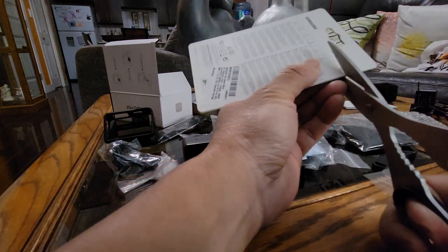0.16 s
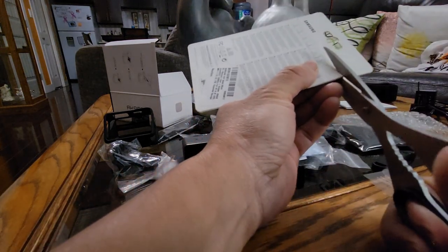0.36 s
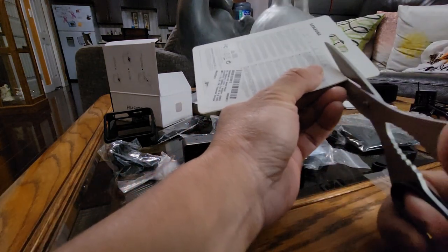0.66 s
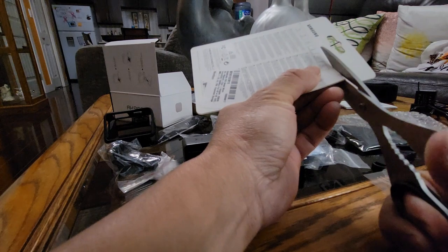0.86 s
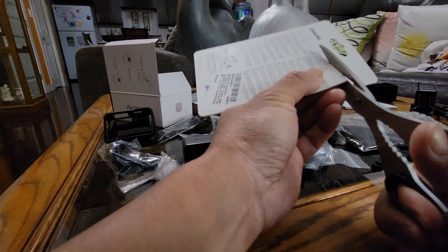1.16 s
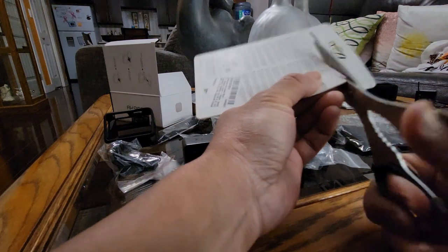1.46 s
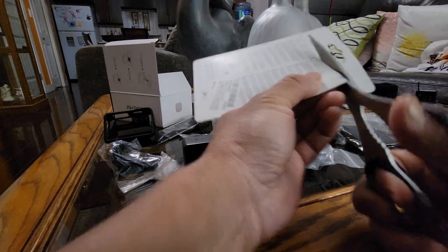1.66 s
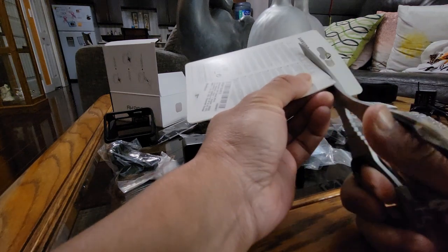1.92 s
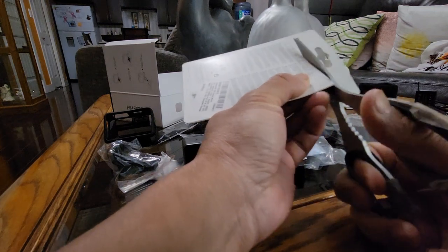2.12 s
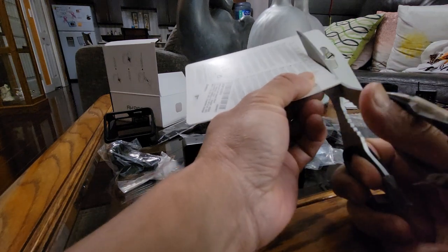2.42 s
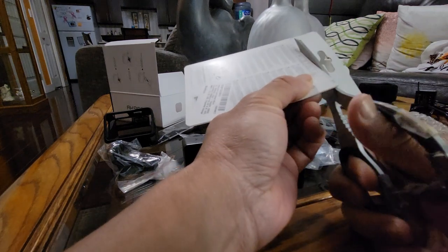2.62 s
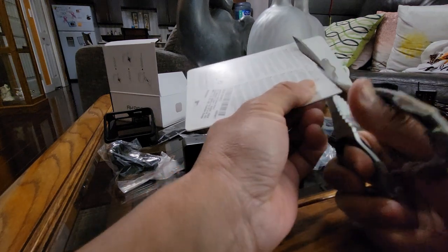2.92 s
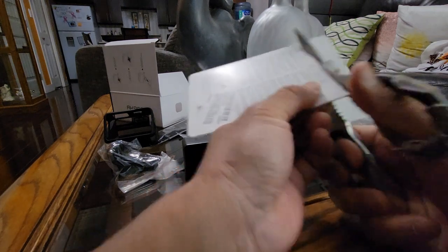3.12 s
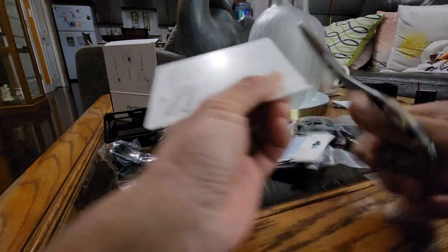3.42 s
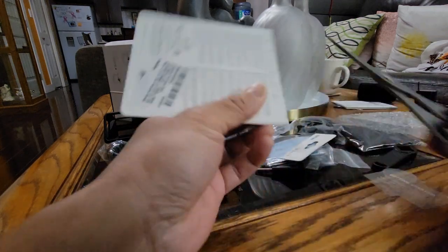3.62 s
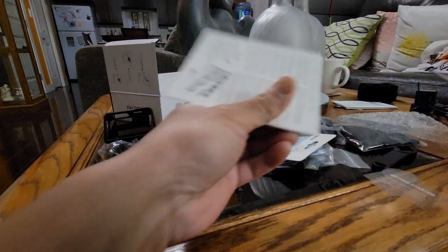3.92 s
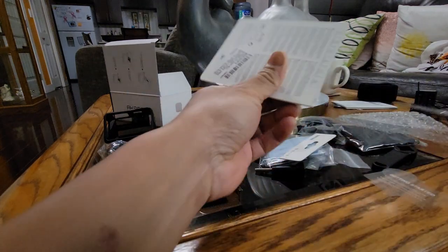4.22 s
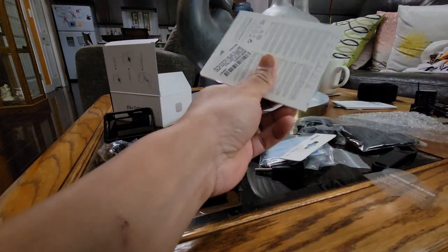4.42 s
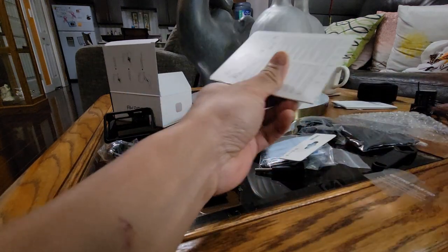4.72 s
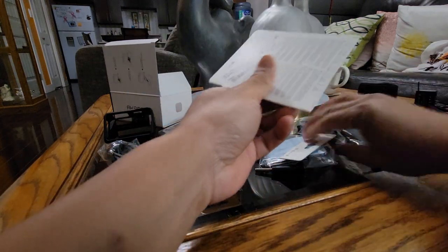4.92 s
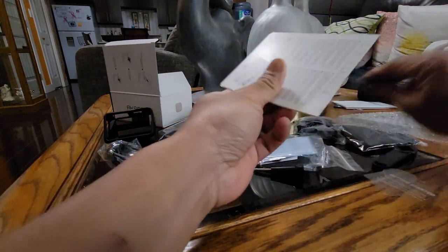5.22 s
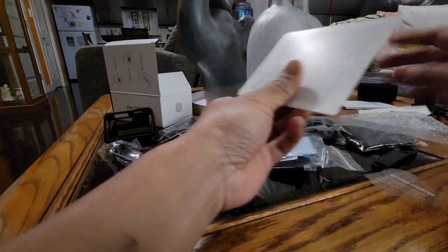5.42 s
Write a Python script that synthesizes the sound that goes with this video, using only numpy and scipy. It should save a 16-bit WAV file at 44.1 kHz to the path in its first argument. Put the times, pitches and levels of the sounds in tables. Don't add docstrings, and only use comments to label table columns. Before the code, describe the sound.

Close, gritty snipping and creaking of scissors in packaging, one sharp snap, a knocking put-down on wood, then brief plastic rustling in a quiet room.

```python
import sys
import numpy as np
from scipy import signal
from scipy.fft import rfft, irfft
from scipy.io import wavfile
from scipy.ndimage import uniform_filter1d, map_coordinates

SR = 44100
rng = np.random.default_rng(int(sys.argv[2]) if len(sys.argv) > 2 else 0)


def voltage_ratio(decibels):
    exponent = np.asarray(decibels, float) / 20
    return 10 ** exponent


def wav_out(sig):
    wavfile.write(sys.argv[1], SR, np.round(np.clip(np.atleast_2d(sig).T, -1, 1) * 32767).astype(np.int16))


N = 245637
TIME = np.arange(N) / SR

# hz, width_hz, level_db
SHELL_MODES = [(920, 400, -7.5), (1250, 160, -2), (1680, 187, -2.5), (2200, 220, -10)]
# hz, width_hz, level_db
BLADE_MODES = [(2810, 354, -4.5), (3430, 220, -0.5), (3810, 293, -2.5), (4940, 590, -9.5),
               (5320, 800, -10.5), (6837, 1100, -11)]
# start_s, left_lag_ms, left_minus_right_db
HAND_PLACE = [(0, .42, -4), (.6, .42, -2), (.75, .2, -3.5), (1.1, .2, -4), (1.45, .07, -2.7),
              (2.6, .03, -.5), (3.2, .04, -3), (4.2, .1, -2), (4.45, .24, -2), (4.9, .14, -4),
              (5.1, .14, -3), (5.35, .28, -4)]


def rms_one(x):
    return x / np.sqrt(np.mean(x ** 2) + 1e-20)


def at_hz(points, hz):
    table_hz, value = np.transpose(points)
    return np.interp(np.log(hz + 1), np.log(table_hz), value)


def body(x, modes):
    out = 0
    for k, (hz, width_hz, db) in enumerate(modes):
        r = np.exp(-np.pi * width_hz / SR)
        zeros = [(1 - r * r) / 2, 0, (r * r - 1) / 2]
        poles = [1, -2 * r * np.cos(2 * np.pi * hz / SR), r * r]
        out = out + (-1) ** k * voltage_ratio(db) * signal.lfilter(zeros, poles, x + 1e-18)
    return out


def cut(x, hz, kind, order=2):
    return signal.sosfilt(signal.butter(order, hz, kind, fs=SR, output="sos"), x)


def grit(spread_db, alike):
    sizes = voltage_ratio(spread_db * np.minimum(rng.exponential(1, N), 6))
    mid, side = rng.standard_normal((2, N)) * sizes
    alike = np.clip(alike, 0, 1)
    return rms_one(np.sqrt(1 + alike) * mid + np.sqrt(1 - alike) * side * [[1], [-1]])


def driven(force, source, modes):
    return body(force * source, modes) / np.std(body(source[0, :30000], modes))


def pan(db):
    return voltage_ratio(np.array([[db / 2], [-db / 2]]))


def pulse(t, rise_ms, fall_ms):
    return np.where(t < 0, np.exp(-(t / rise_ms) ** 2 / 2), np.exp(-np.abs(t) / fall_ms))


def swells(rows, rest_db):
    out = voltage_ratio(np.array(rest_db)[:, None]) * np.ones(N)
    for at, first_db, second_db, rise_ms, fall_ms in rows:
        drop_db = -20000 * np.where(TIME < at, (at - TIME) / rise_ms, (TIME - at) / fall_ms)
        out = np.maximum(out, voltage_ratio(np.array([[first_db], [second_db]]) + drop_db))
    return out


def floor():
    # hz, level_db per Hz
    hush = [(15, -24), (25, -7), (97, 3.5), (197, -11.5), (378, -2), (524, -13.5), (669, -5), (979, -13),
            (1280, -12), (1930, -18.5), (5420, -24.5), (6550, -27.5), (8140, -72.5), (14800, -41.5),
            (16500, -50.5)]
    hush_db = -67.5
    hz = np.fft.rfftfreq(N, 1 / SR)
    mid, side = irfft(rfft(rng.standard_normal((2, N))) * voltage_ratio(at_hz(hush, hz)), N)
    side = cut(side, 260, "high", order=1)
    return voltage_ratio(hush_db) * (mid + 1.27 * side * [[1], [-1]]) / np.std(mid)


def rumble():
    # peak_s, rumble_db, flap_db, rise_ms, fall_ms
    heaves = [(.33, -51.5, -68, 120, 180), (.76, -50, -60, 87, 68), (.94, -53, -77, 63, 70),
              (1.13, -44, -75, 44, 65), (2.31, -70, -60.5, 140, 15), (1.54, -55, -86, 21, 54),
              (2.95, -59, -62.5, 210, 44), (3.11, -75, -57, 37, 130), (3.24, -53.5, -58.5, 47, 290),
              (4.03, -52, -80, 23, 90), (4.33, -44, -64, 14, 78), (4.5, -57.5, -61.5, 110, 300),
              (4.59, -37.5, -45, 132, 350), (4.65, -33.5, -58, 130, 78), (4.87, -72, -64, 550, 330),
              (5.42, -43.5, -87, 77, 46), (5.52, -82, -69, 60, 460)]
    # hz, width_hz, level_db
    flap_modes = [(321, 82, 4.5), (430, 119, -1.5), (816, 450, -26)]
    heave, flap = swells(heaves, rest_db=(-70, -79))
    source = grit(0.95, alike=0.87)
    low = cut(cut(source, 190, "low", order=4), 68, "high", order=4)
    flexing = voltage_ratio(-4.0) * heave * rms_one(low) * pan(-1.5)
    return flexing + driven(voltage_ratio(5.5) * flap, source, flap_modes)


def contacts():
    # start_s, card_body_db, air_db
    strokes = [
        (0, -10, -8),
        (.3, -4, -18.5),
        (.6, -1.5, -17.5),
        (1.0, -7, -17.5),
        (1.4, -6, -17.5),
        (1.79, 3, -15.5),
        (2.05, 6, -17),
        (2.5, 1, -12),
        (2.8, 3.5, -15),
        (3.1, 1, -15),
    ]
    # start_s, peak_db, length_ms
    blade_bites = [(0.075, -50.5, 3.2), (0.236, -40, 3), (0.2696, -33, 1.25), (0.2803, -35, 3.9),
                   (0.333, -45, 15), (0.361, -37, 6.6), (0.3743, -36.5, 2.4), (0.7014, -40, 10),
                   (0.7237, -34, 4.4), (0.7336, -36, 12.6), (0.754, -36.5, 4.8), (0.778, -35, 3.5),
                   (1.073, -27, 2.5), (1.084, -35, 12.6), (1.1046, -26, 6.6), (1.144, -26.5, 6),
                   (1.426, -39, 24), (1.449, -31.5, 8.9), (1.464, -30, 9.4), (1.483, -32.5, 11),
                   (1.498, -44, 8.9), (1.1633, -39, 1.7), (1.782, -36.5, 3.6), (1.786, -39, 18),
                   (1.804, -33.5, 12.4), (1.827, -30.5, 7.5), (1.8605, -28.5, 8.8), (2.1426, -51, 4.3),
                  (2.168, -59, 39), (2.22, -46.5, 3.6), (2.536, -38, 14.7), (2.5559, -33, 12.5),
                  (2.573, -33, 11.7), (2.6, -31.5, 2.2), (2.868, -47, 26), (2.8842, -36.5, 14.4),
                  (2.9, -32.5, 14.8), (2.9241, -27.5, 7.5), (2.962, -28.5, 6.4), (3.17, -45, 29),
                  (3.186, -35.5, 10), (3.206, -32, 13.3), (3.229, -35, 6.8)]
    # start_s, peak_db, length_ms, card_body_db
    crackles = [(3.262, -17.5, 6, -11), (3.345, -32.5, 13.5, -9), (3.369, -32, 16.4, -2.5),
                (3.5066, -46, 9, -1), (4.05, -46.5, 7.5, 5), (4.086, -54, 14, 7.5), (4.1343, -41, 4.6, -1),
                (4.352, -39.5, 4.3, -24), (4.402, -39, 1.8, -0.5), (4.7943, -37, 2.2, -28),
                (4.8959, -29.5, 2.2, -5), (4.903, -34.5, 10.3, -5.5), (4.917, -31, 6, -6),
                (4.939, -36, 3.4, -12), (4.952, -28.5, 7.7, -3.5), (4.967, -34.5, 2.4, 10),
                (4.98, -34, 11, -6), (5.019, -37, 19, -30), (5.077, -49, 2.7, 6), (5.3745, -35, 11.7, 1),
                (5.394, -32.5, 6.4, 11), (5.438, -38.5, 5.6, -2), (5.506, -31, 6, 0)]
    crackle_air_db = -16.5
    starts = [row[0] for row in strokes]
    out = []
    for row in blade_bites:
        stroke = strokes[max(np.searchsorted(starts, row[0]) - 1, 0)]
        out.append((*row, *stroke[1:]))
    return out + [(*row, crackle_air_db) for row in crackles]


def rubs():
    # start_s, level_db, length_ms, card_body_db
    rub_rows = [(0.527, -50.5, 78, -4.5), (0.907, -45.5, 66, 0.5), (1.28, -37.5, 63, 0.5),
                (1.625, -32.5, 34, 7), (1.976, -47.5, 52, 4), (2.236, -60.5, 98, 12.5), (2.736, -40, 59, 7),
                (3.072, -37, 34, 5), (3.257, -38, 59, -12), (3.36, -40.5, 64, -9), (3.44, -59, 69, -16),
                (3.665, -68.5, 18, -23), (4.492, -22.5, 4.2, 4), (4.539, -31, 3.7, 9),
                (4.579, -30.5, 13, 11), (4.631, -33.5, 16, -5), (4.926, -37.5, 108, -6.5),
                (5.02, -34.5, 74, -2), (5.402, -51, 25, 17.5), (5.51, -39, 28, -6)]
    light_below_db, light_air_db, air_db = -7, 0, -16
    return [(*row, light_air_db if row[3] < light_below_db else air_db) for row in rub_rows]


def cutting():
    # peak_s, scrape_db, card_body_db, rise_ms, fall_ms
    slides = [
        (1.84, -64.5, -64, 430, 84),
        (3.3, -61.5, -68.5, 450, 670),
        (3.57, -88, -71, 830, 50),
        (4.67, -57.5, -42.5, 222, 133),
        (5.41, -65.5, -56.5, 120, 480),
        (5.57, -60.5, -78, 240, 110),
    ]
    # hz, width_hz, level_db
    skin_modes = [(2640, 572, 3), (3700, 4200, -2.5), (5300, 720, 3), (6370, 2000, -5.5)]
    # hz, width_hz, level_db
    pack_modes = [(425, 360, -3.5), (820, 180, 4.5), (1340, 546, 2), (1830, 770, -2)]
    # hz, width_hz, level_db
    air_modes = [(10060, 3300, -6), (12470, 1700, 1.5), (14640, 1300, 0.5)]
    # hz, width_hz, level_db
    opening_modes = [(2610, 440, 0), (3500, 660, 0), (5030, 360, -5), (5578, 540, -5), (6948, 580, -10)]
    strip_off_s = 3.25
    air_rest_db, slide_air_db = -95.5, -30.5
    blades, skin, shell, pack, air, opening = range(6)
    force = np.zeros((6, N))
    force[[skin, pack]] = swells(slides, rest_db=(-77.5, -115))
    force[air] = voltage_ratio(air_rest_db) + voltage_ratio(slide_air_db) * force[skin]
    t = np.arange(9000) / SR * 1000
    for is_rub, rows in ((False, contacts()), (True, rubs())):
        for at, db, length_ms, low_db, top_db in rows:
            i, loose = round(at * SR) - 44, at > strip_off_s
            face = skin if loose else opening if is_rub else blades
            bulk = pack if loose or is_rub else shell
            rise = .15 + .85 * np.minimum(t / min(.8 * length_ms, 6.0), 1) ** 1.5
            stop = 1 + np.exp(np.minimum((t - length_ms) / min(0.27 * length_ms, 6.0), 50))
            shape = np.minimum(t / 0.81, 1) * rise / stop
            levels = voltage_ratio(db - 11 + np.array([[0], [low_db], [top_db]]))
            force[[face, bulk, air], i:i + 9000] += levels * shape[:N - i]
    s, _, side_db = np.transpose(HAND_PLACE)
    source = grit(3.04, alike=0.32) * voltage_ratio(np.interp(TIME, s, side_db) * [[.5], [-.5]])
    bright = driven(force[blades], source, BLADE_MODES) + driven(force[skin], source, skin_modes)
    low = -driven(force[pack], source, pack_modes) - driven(force[shell], source, SHELL_MODES)
    spray = cut(driven(force[air], source, air_modes), 7200, "high", order=4)
    drag = cut(driven(force[opening], source, opening_modes), 7300, "low", order=6)
    return cut(bright, 5940, "low", order=6) + low + spray + drag


def pings():
    # peak_s, pitch_hz, peak_db
    ticks = [(1.4316, 3700, -28.5), (1.4538, 3780, -30.5), (1.486, 3500, -35), (1.5005, 3560, -33),
             (1.7847, 3700, -37.5), (2.5377, 3760, -36.5), (2.5427, 2800, -37), (2.5751, 3620, -38),
             (2.601, 4200, -39.5), (2.9307, 3030, -31), (4.897, 4900, -40), (4.904, 5500, -40),
             (4.92, 5500, -34), (4.9325, 4600, -33), (4.9403, 6240, -31), (4.9458, 5000, -30),
             (4.9528, 3600, -24), (4.9565, 6400, -29), (4.9683, 6300, -34), (4.985, 2500, -36),
             (4.9963, 6300, -33), (5.0245, 6100, -34), (5.044, 6500, -40), (5.382, 4500, -31),
             (5.395, 2640, -30), (5.508, 4040, -37), (3.787, 2500, -62), (0.2378, 4280, -42),
             (0.27, 4370, -40)]
    # peak_s, pitch_hz, peak_db,
    # rise_ms, fall_ms
    squeaks = [(1.812, 1580, -34, 1.4, 1.9), (1.8165, 1600, -34, 1.3, 1.1), (1.834, 1610, -34, 1.3, 2.2),
               (1.8685, 1570, -29.5, 0.49, 1.8), (1.8685, 2850, -33, 2.2, 2.1),
               (2.563, 1360, -38, 1.8, 2.2), (2.578, 1300, -38, 1.8, 2.1), (2.89, 1580, -31.5, 2, 2.7),
               (2.929, 1200, -37.5, 1.9, 2.8), (4.973, 890, -47.5, 3, 4.2), (5.048, 872, -40, 3.5, 11),
               (5.082, 874, -36, 2.8, 2.7), (5.396, 1080, -26.5, 0.51, 2.2), (5.517, 285, -39, 4.5, 11),
               (5.412, 333, -41, 7, 6), (5.434, 189, -43, 9.3, 6.9), (5.42, 1250, -41, 8, 15)]
    tick_rise_ms, tick_cycles = 0.14, 2.3
    out, t = np.zeros((2, N)), np.arange(-900, 1500) / SR * 1000
    rows = squeaks + [(at, hz, db, tick_rise_ms, 1000 * tick_cycles / hz) for at, hz, db in ticks]
    for at, hz, db, rise_ms, fall_ms in rows:
        i, start = round(at * SR), rng.uniform(0, 2 * np.pi)
        grain = rms_one(body(rng.standard_normal((2, len(t))), [(hz, .3 * hz, 0)]))
        tone = np.cos(2 * np.pi * hz * t / 1000 + start) + 0.15 * grain
        out[:, i - 900:i + 1500] += voltage_ratio(db) * pulse(t, rise_ms, fall_ms) * tone * pan(-2.2)
    return out


def swishes():
    # start_s, length_ms, pitch_hz, width_hz, level_db
    sweeps = [(.56, 69, 254, 50, -65.5), (1.681, 95, 2450, 250, -64), (1.875, 102, 1640, 90, -74),
              (2.085, 28, 1620, 99, -67.5), (2.278, 60, 205, 40, -60), (3.256, 90, 5270, 1100, -47.5),
              (3.256, 42, 7000, 900, -57), (3.42, 265, 418, 71, -62), (3.45, 160, 555, 80, -75.5),
              (3.499, 152, 1250, 70, -69), (3.71, 49, 5990, 900, -75.5), (4.15, 350, 1448, 70, -73.5),
              (5.27, 135, 1160, 59.3, -69), (5.508, 57, 5500, 450, -58.5), (5.511, 67, 2900, 200, -60.5),
              (5.51, 26, 894, 80, -50.5), (2.538, 48, 3900, 450, -63), (2.884, 30, 3770, 600, -58.5),
              (2.859, 26, 1700, 200, -63), (1.291, 55, 5500, 200, -61)]
    out = np.zeros((2, N))
    for at, length_ms, hz, width_hz, db in sweeps:
        i = round(at * SR)
        size = min(round(length_ms * SR / 1000), N - i)
        tone = rms_one(body(rng.standard_normal((2, SR // 2)), [(hz, width_hz, 0)]))[:, :size]
        swell = np.sqrt(np.abs(np.sin(np.linspace(0, np.pi, size))))
        out[:, i:i + size] += voltage_ratio(db + 5) * tone * swell
    return out


def creaks():
    # at_s, slips_hz, level_db, sharpness_db
    courses = [
        [(.908, 339, -52, 6), (.918, 335, -52.5, 1), (.928, 260, -48.5, -11), (.945, 285, -53, -34),
         (.958, 285, -44, -28), (.972, 337, -59.5, -3), (.998, 354, -59, -22)],
        [(1.2765, 430, -46, 7), (1.285, 322.6, -52.5, -4), (1.294, 343.4, -36, -13), (1.304, 398, -48.5, 4.5),
         (1.32, 354.6, -42.5, -15), (1.335, 373, -65, 0), (1.352, 316, -57, -17)],
        [(1.6265, 299.5, -45.5, 7), (1.635, 343.7, -40, -1), (1.644, 472, -38.5, -0.5), (1.652, 434, -42.5, 5),
         (1.662, 329.5, -43, -4), (1.672, 285.7, -53, 9), (1.695, 199, -64.5, 12.5)],
        [(1.98, 285, -48.5, 7), (1.987, 302, -46, -5.5), (1.997, 326, -48, -14), (2.012, 303, -78, -21)],
        [(2.245, 302.4, -67.5, 1.5), (2.29, 334.5, -59.5, -14), (2.355, 305, -69.5, -15)],
        [(2.7335, 370, -37, -3), (2.742, 400, -48, 6), (2.748, 594, -41, -3.5), (2.755, 681, -36, -13),
         (2.764, 594.6, -46, -4.5), (2.776, 551, -47.5, 2), (2.788, 400, -49, -1), (2.802, 305, -52.5, -3)],
        [(3.07, 327, -42, 1), (3.078, 383, -39.5, -4), (3.084, 581, -44, -5), (3.092, 716, -37, -9),
         (3.1, 645, -42, -2.5), (3.11, 430, -47.5, -1), (3.118, 349, -43, -8), (3.134, 328, -57.5, -17)],
    ]
    # hz, width_hz, level_db
    card_modes = [(392, 69, -22), (810, 120, 4.5), (935, 181, 0), (1250, 150, 1), (1900, 230, -3.5),
                  (2000, 230, -4.5), (2620, 510, -14.5), (3300, 740, -26.5), (4970, 670, -24)]
    # hz, width_hz, level_db
    ring_modes = [(396, 8.3, -5.5), (737, 5.7, -1.5), (2823, 30, 1.5)]
    rate_jitter, wobble_db, click_spread_db, overtone_db = .02, 1.2, 1.5, -2.5
    bow, sharp = np.zeros((2, N))
    for course in courses:
        s, hz, db, sharp_db = np.transpose(course)
        i, j = round(s[0] * SR), round(s[-1] * SR)
        chance = rng.standard_normal((3, SR // 5))
        wobble = uniform_filter1d(chance, size=130)[:, :j - i] * 11
        slip_hz = np.interp(TIME[i:j], s, hz) * (1 + rate_jitter * wobble[0])
        phase = 0.74 + np.cumsum(slip_hz) / SR
        level = voltage_ratio(np.interp(TIME[i:j], s, db) + wobble_db * wobble[1])
        edge = voltage_ratio(np.interp(TIME[i:j], s, sharp_db))
        overtone = voltage_ratio(overtone_db) * edge * np.sin(4 * np.pi * phase + 0.08)
        onset = np.minimum(np.arange(j - i) / 26.0, 1)
        bow[i:j] = level * (np.sin(2 * np.pi * phase) + overtone) * onset
        slips = np.flatnonzero(np.diff(np.floor(phase)))
        sharp[i + slips] = level[slips] * edge[slips] * voltage_ratio(click_spread_db * chance[2, :len(slips)])
    other = voltage_ratio(24.5) * cut(body(sharp, BLADE_MODES[:3] + SHELL_MODES), 680, "high")
    clicks = voltage_ratio(40.5) * cut(body(sharp, card_modes), 380, "high")
    direct = voltage_ratio(6.0) * cut(bow, 220, "high", order=4) + clicks
    return direct + body(direct, ring_modes) + other * [[1], [-1]]


def snap():
    # pitch_hz, level_db, fall_ms, left_minus_right_db
    whips = [(2450, -18, 1.0, -5), (3600, -16, .5, -6), (4880, -9, .8, -12), (5650, -7.5, .6, -8),
             (9700, -14, .5, -3), (7000, -8, .35, -3), (12600, -15, .5, 0), (14500, -21, .4, -2),
             (1100, -24, 1.2, -3), (1400, -25, 1.5, -3), (10800, -22, .35, -1), (7700, -16, .4, -3)]
    # from_break_ms, pitch_hz, level_db, rise_ms, fall_ms
    strains = [
        (-3.5, 1610, -23, 2.8, .9),
        (-4, 3700, -33, 3.5, 1.5),
        (2.4, 5600, -27, .4, 1.5),
        (-2.5, 5800, -31, 2.5, 1.5),
        (-3, 8700, -35, 1.2, 1.2),
        (3, 2500, -32, 1, 1.5),
    ]
    snap_s, whip_rise_ms, strain_side_db = 3.2509, .3, -12
    skew = 1.3
    out, t = np.zeros((2, N)), np.arange(-400, 400) / SR * 1000
    parts = [(0, hz, db, whip_rise_ms, fall_ms, side_db) for hz, db, fall_ms, side_db in whips]
    parts += [(*row, strain_side_db) for row in strains]
    for k, (ms, hz, db, rise_ms, fall_ms, side_db) in enumerate(parts):
        i = round((snap_s + ms / 1000) * SR)
        grain = rms_one(body(rng.standard_normal((2, 800)), [(hz, .25 * hz, 0)]))
        tone = (-1) ** k * np.cos(2 * np.pi * hz * t / 1000 + [[skew], [0]]) + .3 * grain
        out[:, i - 400:i + 400] += voltage_ratio(db) * pulse(t, rise_ms, fall_ms) * tone * pan(side_db)
    return out


def knocks():
    # hit_s, level_db, contact_cutoff_hz, steel_db
    touches = [(4.33, -51.5, 404.5, 5), (4.4956, -22, 6000, -0.5), (4.512, -34.5, 1500, 10),
               (4.5414, -26.5, 2000, 5), (4.567, -24.5, 1830, 5), (4.5848, -13.5, 1480, 2.5),
               (4.598, -16.5, 688, 0), (4.605, -23.5, 2510, 0.5), (4.6339, -16, 1990, 2.5),
               (4.657, -27, 700, -11), (4.671, -30, 700, 14), (5.393, -42.5, 1490, -2),
               (5.411, -41.5, 700, 13), (5.508, -42.5, 3000, 5.5), (5.516, -42, 915, 1)]
    # hz, level_db, t60_s
    wood = [(94.8, -15.5, 0.14), (126.8, -17, 0.094), (165.2, -9.5, 0.12), (238, -10, 0.11),
            (285, 4.5, 0.046), (334, -8, 0.12), (400, -17.5, 0.065), (686, -7, 0.047), (745, -15.5, 0.24),
            (863, -7, 0.088), (913, 2, 0.032), (1020, -3.5, 0.05), (1220, -21, 0.29), (1600, -8.5, 0.087),
            (1730, -8.5, 0.063)]
    # hz, level_db, t60_s
    steel = [(1940, -18, 0.068), (2134, -14.5, 0.19), (2710, -16, .22), (2820, -11.5, .11), (2990, -8, .08),
             (4350, -19, .08), (3120, -21, .12), (3560, -22.5, 0.41), (5500, -18.5, 0.081),
             (5890, -12, 0.039)]
    out, t = np.zeros((2, N)), np.arange(9500) / SR
    for at, db, cut_hz, steel_db in touches:
        modes = wood + [(hz, mode_db + steel_db, t60) for hz, mode_db, t60 in steel]
        i, chance = round(at * SR), rng.standard_normal((len(modes), 4))
        ring = 0
        for (hz, mode_db, t60), (level, left, right, sign) in zip(modes, chance):
            skew = .0004 * hz * np.array([[left], [right]])
            buzz = np.interp(t, np.arange(100) / 350, rng.standard_normal(100)) * min(.0006 * hz, 1.5)
            way = 1 if 200 < hz < 350 else -1 if hz < 500 else np.sign(sign)
            decay = voltage_ratio(mode_db + 1.2 * level - 60 * t / t60)
            ring = ring + way * decay * np.sin(2 * np.pi * hz * t + skew + buzz)
        hit = cut(ring * (1 - np.exp(-t / 0.00026)), cut_hz, "low", order=1)
        out[:, i:i + 9500] += voltage_ratio(db - 4.0) * hit[:, :N - i] * pan(-1.8)
    return cut(out, 72, "high", order=4)


def room(x):
    # hz, t60_s
    decay_times = [(100, 0.3), (1000, 0.36), (5000, 0.31), (15000, 0.23)]
    t, edges, tail = np.arange(26000) / SR, 90 * 2.0 ** np.arange(0, 8), 0
    white = rng.standard_normal((2, len(t)))
    for low, high in zip(edges, np.append(edges[1:], 17000)):
        noise = cut(white if low > 200 else white[[0, 0]], [low, high], "band")
        tail = tail + noise * voltage_ratio(-60 * t / at_hz(decay_times, np.sqrt(low * high)))
    tail = tail * (1 - np.exp(-(t / 0.0015) ** 2))
    tail = tail / np.sqrt(np.sum(tail ** 2, 1, keepdims=True))
    return signal.fftconvolve(x[1:], tail, axes=1)[:, :N]


def scene():
    near, crack = [cutting(), creaks(), knocks()], snap()
    sends_db = (-11, -15.5, -11.5, -19)
    wet = room(sum(voltage_ratio(db) * x for db, x in zip(sends_db, near + [crack])))
    around = swishes() + rumble() + floor()
    left, right = sum(near) + pings()
    s, lag_ms, _ = np.transpose(HAND_PLACE)
    late = np.arange(N) - np.interp(TIME, s, lag_ms) * SR / 1000
    left = map_coordinates(left, [late], order=3)
    return np.array([left, right]) + crack + wet + around


def band_limit(x):
    return signal.sosfilt(signal.butter(12, 16980, fs=SR, output="sos"), x)


def record(dry):
    x = signal.sosfilt(signal.cheby2(12, 60, 16900, fs=SR, output="sos"), dry)
    x = np.clip(x, -.87, .87)
    return band_limit(x)


dry = scene()
out = record(dry)
wav_out(out)
```